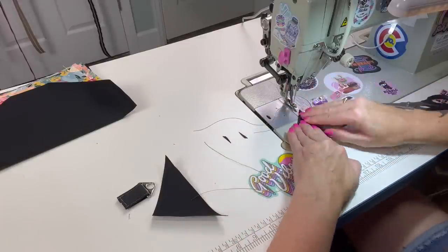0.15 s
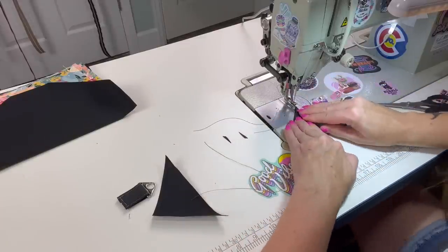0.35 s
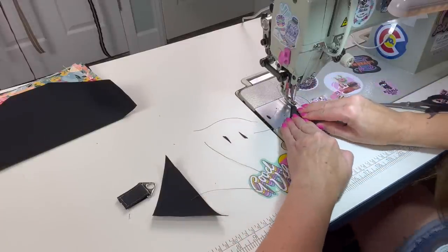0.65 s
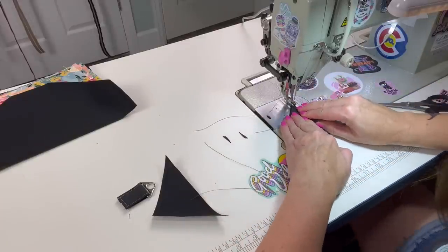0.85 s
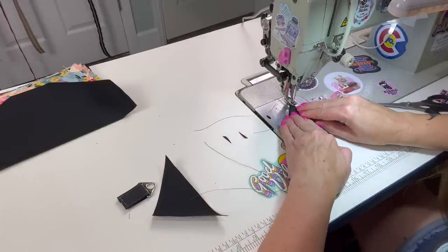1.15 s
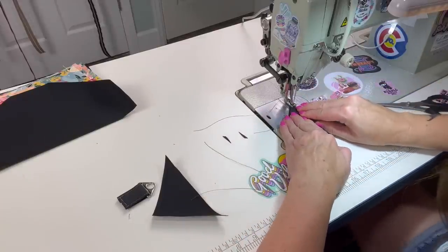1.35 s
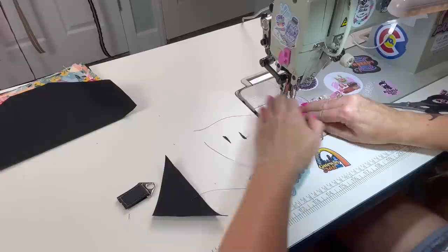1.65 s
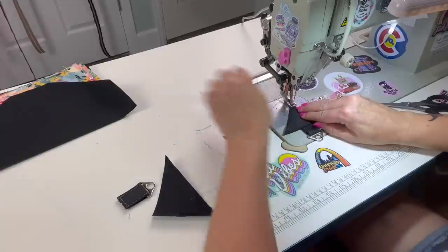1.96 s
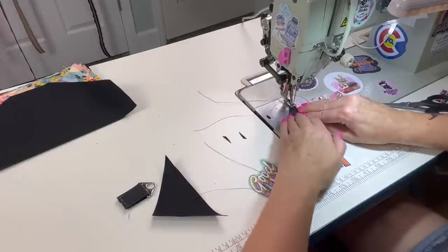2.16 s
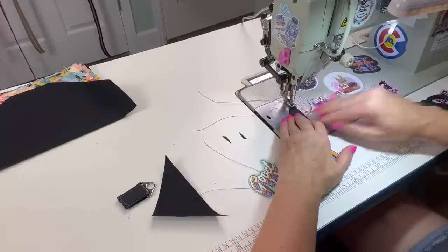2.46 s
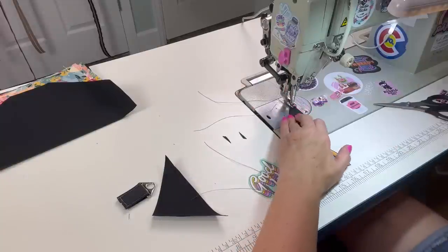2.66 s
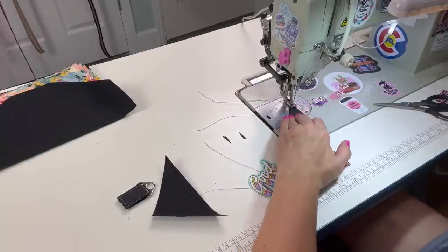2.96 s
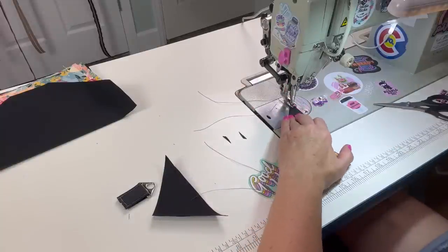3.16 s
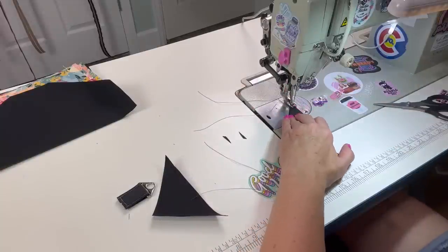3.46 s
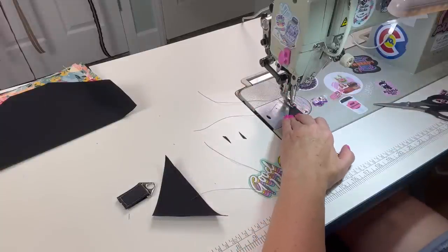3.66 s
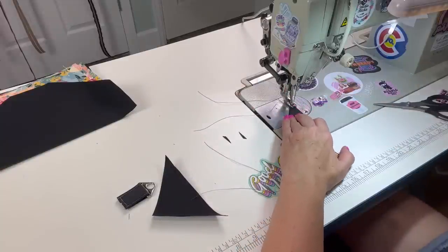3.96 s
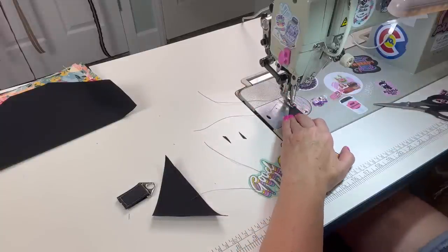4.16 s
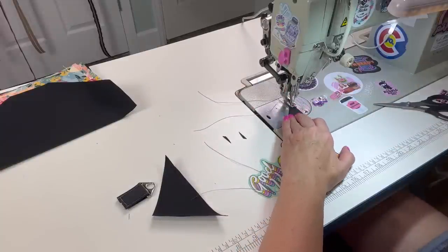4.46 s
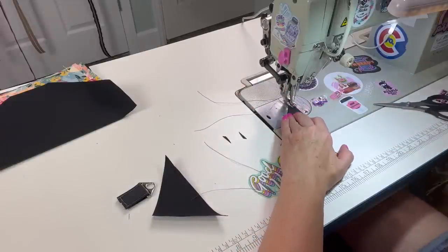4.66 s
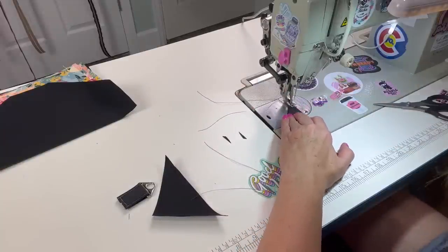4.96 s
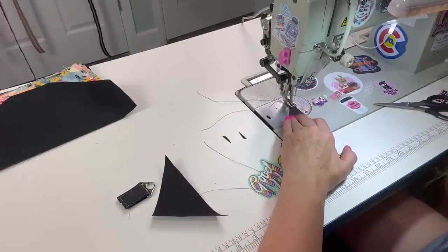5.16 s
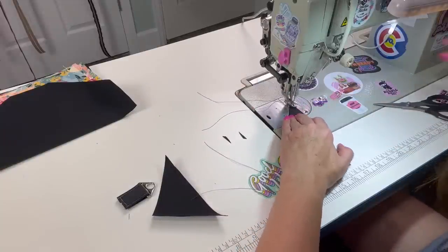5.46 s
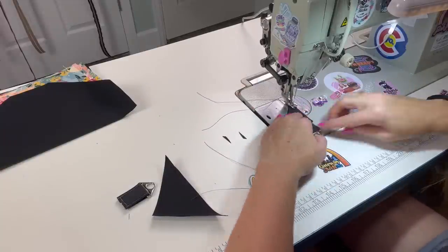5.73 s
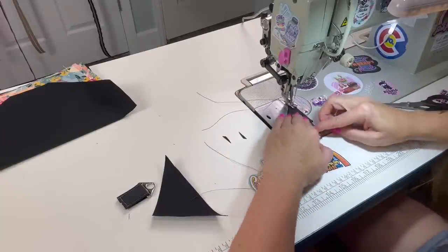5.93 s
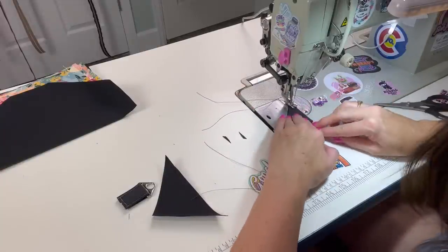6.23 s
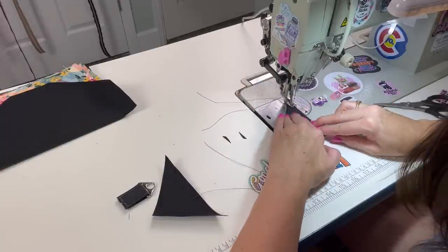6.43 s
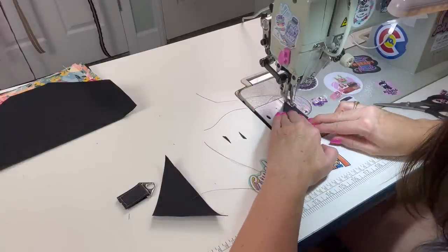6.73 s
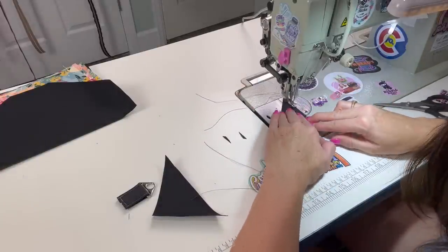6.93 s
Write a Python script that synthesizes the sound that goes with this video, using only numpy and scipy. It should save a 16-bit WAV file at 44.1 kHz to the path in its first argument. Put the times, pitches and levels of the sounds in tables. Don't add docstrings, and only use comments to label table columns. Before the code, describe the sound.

Soft fabric rustle and low thuds from a presser foot and knee lever, then quiet, then sharp little metallic snaps and a small tap. An industrial sewing machine starts slowly, each turn a woody knock with ticking steel, rasping hook and low motor hum. It brakes with thumps, rests, then stitches again slightly faster to the end. Close phone microphone, small room with short reverberation, steady low air rumble.

```python
import sys
import numpy as np
from scipy import signal
from scipy.fft import rfft, irfft, next_fast_len
from scipy.io import wavfile
from scipy.ndimage import uniform_filter1d

SR = 44100
rng = np.random.default_rng(int(sys.argv[2]) if len(sys.argv) > 2 else 0)


def transcribe(u):
    v = np.clip(np.atleast_2d(u).T, -1, 1)
    q = np.round(v * 32767).astype(np.int16)
    wavfile.write(sys.argv[1], SR, q)


def makeup_ratio(level_db):
    decades = np.asarray(level_db, float) / 20
    return 10 ** decades


N = 312669
T = np.arange(N) / SR

# needle down t/s, turn/s, knock level/dB, hook lag/s, hook tick level/dB
STITCHES = [(4.549, 0.18, -44, 0.039, -30), (4.733, 0.21, -41, 0.046, -25),
            (4.917, 0.23, -39, 0.041, -29.5), (5.102, 0.18, -39, 0.03, -36),
            (5.283, 0.21, -37, 0.031, -23.5), (5.463, 0.21, -40, 0.019, -44),
            (6.49, 0.15, -39.5, 0.031, -34), (6.634, 0.13, -39, 0.035, -31.5),
            (6.778, 0.14, -38.5, 0.024, -31.5), (6.919, 0.14, -36, 0.041, -29.5),
            (7.06, 0.087, -38, 0.036, -39)]
# t/s, drum level/dB, drum f/Hz, bed knock level/dB
JOLTS = [(4.39, -39.5, 226.5, -73), (4.626, -37.5, 100.5, -51), (4.784, -49, 196, -36.5),
         (5.188, -39, 70, -51), (5.36, -31.5, 500, -68), (5.679, -38, 334, -46), (5.703, -41, 257, -72),
         (5.72, -28.5, 179, -73), (5.791, -39.5, 149.4, -88), (5.919, -40, 72, -74),
         (6.025, -63, 105, -67.5), (6.21, -64, 190, -74), (6.332, -58, 299, -56.5),
         (6.398, -33.5, 86.5, -47.5)]


def unit(x):
    return x / np.sqrt(np.mean(x ** 2))


def on_log_hz(hz, table, col=1):
    table = np.array(table)
    return np.interp(np.log(np.maximum(hz, 1)), np.log(table[:, 0]), table[:, col])


def colour(x, table):
    size = next_fast_len(x.shape[-1])
    gain = makeup_ratio(on_log_hz(np.fft.rfftfreq(size, 1 / SR), table))
    return irfft(rfft(x, size) * unit(gain), size)[..., :x.shape[-1]]


def ring(x, modes):
    total, power = 0, 0
    for hz, db, t60_s in modes:
        pole = np.exp(2j * np.pi * hz / SR - np.log(1000) / (min(t60_s, 1) * SR))
        total = total + makeup_ratio(db) * signal.lfilter([1], [1, -pole], x).imag
        power += makeup_ratio(db) ** 2 / (2 * (1 - abs(pole) ** 2))
    return total / np.sqrt(power)


def peak_one(x):
    return x / np.abs(x).max()


def blows(times_s, dbs, lengths_s, rise_s=0.00038):
    envelope = np.zeros(N)
    for s, db, length_s in zip(*np.broadcast_arrays(np.atleast_1d(times_s), dbs, lengths_s)):
        start = int(s * SR)
        t = T[:min(int(8 * abs(length_s) * SR) + 8, N - start)]
        burst = (1 - np.exp(-t / rise_s)) * np.exp(-t / max(length_s, 1e-4))
        envelope[start:][:len(t)] += makeup_ratio(db) * burst
    return envelope * rng.standard_normal((2, N))


def grains(rate_hz, spread_db, length_s):
    size = makeup_ratio(spread_db * np.minimum(rng.exponential(size=N), 2.5))
    taps = (rng.random(N) < rate_hz / SR) * size
    envelope = signal.lfilter([1], [1, -np.exp(-1 / (length_s * SR))], taps)
    return unit((envelope + 0.24) * rng.standard_normal((2, N)))


def swell(s, rise_s, fall_s):
    return np.exp(-np.abs(T - s) / np.maximum(np.where(T < s, rise_s, fall_s), 1e-4))


def bar_times():
    s, turn_s = np.transpose(STITCHES)[:2]
    return (s + .035 + .2 * turn_s)[:-1]


def stitching():
    # full level/dB, slope dB per dB of load, sag over one turn/dB
    chatter = (-53, 0.8, -9)
    rumble = (-48, 0.52, -5.5)
    # f/Hz, level/dB, t60/s
    table_modes = [(61, -47, 0.21), (82.3, -3.5, 0.23), (118, -6.5, 0.14), (167.4, 12, 0.027),
                   (188.6, -4.5, 0.1), (246, -16, 0.09), (294.5, -5.5, 0.17), (314, -2.5, 0.14),
                   (500, 9, 0.0067)]
    bed_modes = [(550, 13, 0.017), (614, 1, 0.018), (837, -1, 0.08), (1150, 17, 0.011), (2430, 4, 0.028),
                 (2630, -7, 0.029), (3242, 3, 0.036)]
    plate_modes = [(1620, 6, 0.045), (1397, 0, 0.09), (1740, -1, .04), (1108, -6, .06), (829, -5, .07),
                   (666, -4, .05), (2867, -6, .05)]
    # f/Hz, level/dB
    rattle = [(250, -41), (500, 2), (1000, -4.5), (1700, 13), (3000, 2.5), (5000, -4), (10000, -19.5)]

    s, _, db = np.transpose(STITCHES)[:3]
    jolt_s, _, _, jolt_db = np.transpose(JOLTS)
    feed = blows(s - .002, db, 0.012, rise_s=0.0028)
    bar = blows(bar_times(), db[:-1] - 2.5, 0.006, rise_s=0.0024)
    knocks = feed + bar
    bed = makeup_ratio(-5.5) * gear(chatter) * grains(250, 4.1, 0.0029) + knocks + blows(jolt_s, jolt_db, .018)
    table = gear(rumble) * grains(150, 1.03, 0.0067)
    links = clacks(np.r_[s, bar_times()], np.r_[db, db[:-1]])
    body = makeup_ratio(-2.5) * ring(bed, bed_modes) + ring(table, table_modes)
    plate = makeup_ratio(-7.5) * ring(knocks + makeup_ratio(0.5) * bed, plate_modes)
    return body + plate + colour(bed, rattle) + links + thumps() + hum() + hook_steel() + pings()


def gear(layer):
    # t/s, level rel full/dB
    load = [
        [(4.15, -32.5), (4.22, -15), (4.36, -7.5), (4.56, 3), (5.56, 5), (5.63, -4), (5.71, -2.5), (5.77, -19),
         (5.9, -33)],
        [(6.2, -12.5), (6.29, -4), (6.41, -0.5), (6.49, 6), (6.7, 6), (7.09, 7.5)],
    ]
    drive = np.zeros(N)
    for rows in map(np.array, load):
        inside = (T >= rows[0, 0]) & (T <= rows[-1, 0])
        drive[inside] = makeup_ratio(np.interp(T[inside], rows[:, 0], rows[:, 1]))
    full_db, slope, sag_db = layer
    s, turn_s = np.transpose(STITCHES)[:2]
    last = np.maximum(np.searchsorted(s, T) - 1, 0)
    angle = np.where(T < s[0], 1, np.clip((T - s[last]) / turn_s[last], 0, 1))
    return makeup_ratio(full_db + sag_db * uniform_filter1d(angle, size=400)) * drive ** slope


def hook_steel():
    # full level/dB, slope dB per dB of load, sag over one turn/dB
    spin = (-50.5, 1.18, -7)
    # t/s, peak level/dB, rattle rel level/dB
    loose_ticks = [(4.311, -31.5, -16), (4.3918, -29.5, -17), (4.529, -41, -10.5), (4.64, -42, -8),
                   (5.088, -42.5, -7.5), (5.192, -36, -20), (5.5224, -30.5, -6.5), (5.6475, -41, -9.5),
                   (6.2466, -34, -16.5), (6.355, -32.5, -11), (6.552, -31.5, -8), (6.834, -33, -7.5)]
    # t/s, level/dB, length/s
    drags = [(4.312, -41.5, 0.0089), (4.392, -44, 0.007), (4.566, -38, .008), (4.752, -31, 0.0095),
             (4.935, -39, 0.011), (5.129, -39, 0.007), (5.18, -36, 0.0072), (5.285, -39, .008),
             (5.45, -35.5, 0.0071), (5.497, -35, 0.0071), (6.253, -43, 0.013), (6.341, -36.5, 0.0074),
             (6.515, -38, .012), (6.652, -34, 0.01), (6.698, -46, .008), (6.791, -43, 0.009),
             (6.94, -33, 0.0063)]
    # t/s, level/dB
    squeaks = [
        (4.315, -54),
        (4.4, -53),
        (5.58, -55),
    ]
    # f/Hz, level/dB
    bright = [(1500, -10.5), (3000, -2.5), (5000, 0), (6500, -2.5), (9000, -5.5), (12500, -15),
              (14200, -10.5), (16000, -40)]
    # f/Hz, level/dB, t60/s
    hook_modes = [(4630, 2, 0.03), (4560, -5, 0.02), (9000, -14, 0.02)]
    arm_modes = [(2240, 0, .045), (2170, -3, .03)]

    s, _, db, lag_s, hook_db = np.transpose(STITCHES)
    loose_s, loose_db, loose_tail_db = np.transpose(loose_ticks)
    at_s = np.r_[s, (s + lag_s)[:-1], loose_s]
    peak_db = np.r_[db - 5, hook_db[:-1], loose_db]
    tail_db = np.r_[np.full(2 * len(s) - 1, -11), loose_tail_db]
    ticks = blows(at_s, peak_db - 7.5, 0.00092, rise_s=.0001) + blows(at_s, peak_db + tail_db, 0.021)
    whirr = makeup_ratio(-7.0) * gear(spin) * grains(500, 1.4, 0.0028)
    rasp = makeup_ratio(-15) * whirr + blows(*np.transpose(drags), rise_s=0.012)
    squeak = blows(*np.transpose(squeaks), 0.044, rise_s=0.0066)
    arm = ring(whirr + ticks + makeup_ratio(11) * squeak, arm_modes)
    return colour(whirr + ticks, bright) + ring(rasp, hook_modes) + makeup_ratio(-15) * arm


def clacks(times_s, dbs):
    out, t = np.zeros(N + SR // 8), T[:SR // 20]
    for s, db, chance in zip(times_s, dbs, rng.standard_normal((len(times_s), 3, 3))):
        for pitch, size, late in chance:
            start = int((s + 0.0055 * abs(late)) * SR)
            hz = 1100 * makeup_ratio(3.5 * pitch)
            out[start:][:len(t)] += makeup_ratio(db - 4 + 2 * size) * np.sin(2 * np.pi * hz * t) * np.exp(-t / .006)
    return out[:N]


def thumps():
    out, t = np.zeros(N), T[:SR // 8]
    s, _, db = np.transpose(STITCHES)[:3]
    down = np.c_[s, db + 6, 225.5 * makeup_ratio(1.8 * rng.standard_normal(len(s)))]
    up = np.c_[bar_times(), db[:-1] + 6, np.full(len(s) - 1, 237)]
    for s, db, hz in np.r_[down, up, np.array(JOLTS)[:, :3]]:
        swing = np.sin(2 * np.pi * hz * t) * (1 - np.exp(-t / 0.0032)) * np.exp(-t / 0.019)
        out[int(s * SR):][:len(t)] += (makeup_ratio(db - 4.0) * swing)[:N - int(s * SR)]
    return out


def pings():
    # t/s, peak level/dB, ring f/Hz
    contacts = [(4.3107, -37, 5500), (4.3925, -36, 5060), (4.505, -50, 6200), (4.5316, -52, 4520),
                (4.5676, -49, 7500), (4.584, -33, 8900), (4.591, -33.5, 5560), (4.6412, -39.5, 3200),
                (4.7643, -36.5, 9700), (4.7746, -31.5, 6660), (4.782, -25, 2870), (4.9587, -35, 5540),
                (5.0584, -48, 8700), (5.1443, -41, 3780), (5.1913, -45, 6400), (5.3168, -30, 5560),
                (5.46, -37, 4700), (5.522, -44, 4930), (5.5435, -33.5, 3700), (5.6471, -54, 5930),
                (6.2447, -40.5, 5070), (6.3537, -37, 4600), (6.5158, -50, 11100), (6.5278, -46, 4700),
                (6.552, -35.5, 6000), (6.6357, -36.5, 4860), (6.673, -40, 4930), (6.693, -46, 11100),
                (6.7787, -37, 2530), (6.8368, -39, 5170), (6.9173, -39.5, 2700), (6.958, -35, 4870),
                (7.061, -39, 5720)]
    t60_s, edge_db = 0.01, 6.5
    out, tap = np.zeros(N + SR), 1. * (np.arange(SR // 50) == 0)
    edge = peak_one(ring(tap, [(9300, 0, 0.0037), (12500, 0.0029, 0.0026), (14800, 0, 0.002)]))
    for s, db, hz in contacts:
        part = ring(tap, [(hz, 0, t60_s), (1.21 * hz, -3, t60_s)])
        part = peak_one(ring(part, [(hz, 0, .0012)]))
        out[int(s * SR):][:len(tap)] += makeup_ratio(db) * (part + makeup_ratio(edge_db) * edge)
    return out[:N]


def hum():
    # start t/s, length/s, level/dB
    pulls = [
        (4.447, 0.26, -59),
        (4.635, 0.27, -57.5),
        (5.003, 0.26, -59.5),
        (5.286, 0.22, -52),
        (6.397, 0.037, -54),
        (6.487, 0.11, -52.5),
        (6.655, 0.53, -60),
    ]
    # multiple, level/dB
    orders = [(1, -32), (2, 0), (3, 1.5), (4, -6.5)]
    drive_hz, edge_s = 243.1 / 3, 0.013
    phase = 2 * np.pi * drive_hz * T
    level = np.zeros(N)
    for s, length_s, db in pulls:
        inside_s = np.minimum(T - s, s + length_s - T)
        level += makeup_ratio(db) * np.clip(inside_s / edge_s + .5, 0, 1)
    return makeup_ratio(2.0) * level * sum(makeup_ratio(db) * np.sin(k * phase + k) for k, db in orders)


def foot():
    # t/s, peak level/dB, plate ring level/dB, clank level/dB, push length/s
    hits = [
        (0.113, -34, -35, -50, 0.0039),
        (0.159, -43, -39.5, -59, 0.0087),
        (0.197, -45, -45.5, -74, 0.006),
        (1.343, -42.5, -44, -56.5, 0.0045),
        (1.424, -33.5, -38.5, -32.5, 0.0053),
        (1.461, -39, -48, -62, 0.0057),
        (3.278, -65, -60, -51, 0.0017),
        (3.542, -50.5, -58, -57.5, 0.0038),
    ]
    # peak t/s, level/dB, f/Hz, rise/s, fall/s
    shudders = [
        (0.124, -47.5, 125.3, 0.0068, 0.089),
        (0.259, -45, 109, 0.047, 0.019),
        (1.255, -40, 113.5, 0.029, 0.045),
        (1.32, -37.5, 121, 0.0097, 0.014),
    ]
    # f/Hz, level/dB, t60/s
    low_modes = [(130, -12, 0.12), (254, -7, 0.12), (318.8, 4, 0.17), (351, -3, 0.1), (439, -13, 0.062)]
    mid_modes = [(625, 5.5, 0.07), (702, 10.5, 0.058), (793, 1.5, 0.046), (1135, -5, 0.04)]
    lever_modes = [(1990, 1.5, 0.05), (2840, -3, 0.06), (3460, -2, 0.05), (4300, 0, .045)]
    pin_modes = [(1153, -18, 0.1), (2260, -27, 0.16), (5071, -11, 0.07), (6800, -28, 0.06),
                 (8640, -15, 0.2), (468, -22, .07), (813, -25, .07), (307, -23, .08)]
    # f/Hz, level/dB
    clank_colour = [(200, -5.5), (600, 15.5), (1500, -7), (3000, 4.5), (5000, -2), (9000, -19),
                    (16000, -51)]
    pin_clack = [(130, 13.5), (250, 9.5), (600, 4.5), (1400, -12), (3400, -13.5), (6300, -2.5),
                 (9000, -3.5), (12500, -11.5)]

    s, db, plate_db, clank_db, push_s = np.transpose(hits)
    thuds = makeup_ratio(9.5) * ring(blows(s - .002, db, 0.75 * push_s), low_modes)
    thuds = thuds + makeup_ratio(9) * ring(blows(s - .002, plate_db, 0.33 * push_s), mid_modes)
    clank = blows(s - .001, clank_db, 4 * push_s)
    thuds = thuds + makeup_ratio(-3.0) * colour(clank, clank_colour) + makeup_ratio(-21.5) * ring(clank, lever_modes)

    shudder = np.zeros(N)
    for s, db, hz, rise_s, fall_s in shudders:
        shudder += makeup_ratio(db) * swell(s, rise_s, fall_s) * np.sin(2 * np.pi * hz * (T - s))

    pin_s = 3.5375
    touch = blows(pin_s, -9.5, 0.00089, rise_s=.0001) + blows(pin_s, -26, 0.028)
    tap = 1. * (np.arange(N) == int(pin_s * SR))
    pin = colour(touch, pin_clack) + makeup_ratio(2.5) * ring(tap, pin_modes)
    return thuds + makeup_ratio(-0.5) * uniform_filter1d(shudder, size=40) + makeup_ratio(-29.5) * peak_one(pin)


def snaps():
    # t/s, low ring level/dB, high
    # ring level/dB, high ring f/Hz, top level/dB
    events = [(2.078, -68, -64, 5400, -95), (2.143, -67, -55.5, 6150, -63), (2.7176, -66, -87, 5270, -83.5),
              (2.7812, -35, -26.5, 6200, -42), (2.83, -46, -18.5, 6440, -38.5),
              (2.993, -54.5, -44.5, 6200, -71.5), (3.026, -73, -28, 6120, -40.5),
              (3.222, -62, -66.5, 5800, -70.5), (3.2414, -39, -40, 4900, -65),
              (3.271, -36.5, -31, 5600, -37.5), (3.2735, -25.5, -20, 6370, -32.5),
              (3.2837, -38, -39.5, 5200, -57.5), (2.7924, -52, -45.5, 6200, -58),
              (2.8345, -53, -33.5, 7000, -53), (4.783, -44, -59, 5000, -89),
              (5.2765, -27.5, -24, 6230, -48), (5.983, -68, -56.5, 5100, -88.5),
              (6.026, -58.5, -53.5, 4900, -67)]
    # t/s, level/dB
    bounces = [
        (2.7812, -38),
        (2.7925, -41),
        (2.806, -50.5),
    ]
    # f/Hz, level/dB, t60/s
    handle_modes = [(2390, -9, .04), (3316, -1, .04), (2900, -4, .04), (3830, -8, .04), (4436, -7, .05),
                    (2080, -12, .04)]
    blade_modes = [(7354, -1.5, .07), (6360, -9, 0.037), (5600, -6, .04), (3500, -5, 0.044)]
    # f/Hz, level/dB
    joint = [(800, -48), (1400, -26), (2600, -1), (4000, -1.5), (7000, -2), (12000, -21)]

    out, crack = np.zeros(N), np.zeros(SR // 16)
    crack[[30, 70, 90]] = .04, -.2, 1
    low_hz = 3125
    low = [(low_hz, 0, .005), (.77 * low_hz, -16, .014), (.9 * low_hz, -3, .005)]
    top = [(8750, 13.0, 0.00077), (12000, 6.5, 0.0011), (13900, 6.0, 0.00032)]
    for s, low_db, high_db, high_hz, top_db in events:
        high = [(high_hz, 0, .003), (1.14 * high_hz, -6, .004)]
        for modes, db in ((low, low_db + 2.0), (high, high_db - 1.0), (top, top_db + 15.5)):
            part = ring(ring(crack, modes), modes)
            out[int(s * SR) - 55:][:len(crack)] += makeup_ratio(db) * peak_one(part)
    loop = peak_one(ring(crack, [(2397, 0, 0.027)]))
    for s, db in bounces:
        out[int(s * SR) - 90:][:len(crack)] += makeup_ratio(db) * loop
    out = signal.sosfilt(signal.butter(4, 1600, "high", fs=SR, output="sos"), out)

    s, low_db, high_db = np.transpose(events)[:3]
    handle = ring(blows(s + 0.0017, low_db - 10, 0.0016), handle_modes)
    blade = ring(blows(s + 0.0012, high_db - 19, .003), blade_modes)
    rattle = colour(blows(s + 0.00056, low_db - 15, 0.012), joint)
    side_lead = 14
    return np.array([out, np.roll(out, -side_lead)]) + handle + blade + rattle


def cloth():
    # peak t/s, level/dB, treble rel level/dB, rise/s, fall/s
    slides = [(.002, -74.5, 10, .01, .1), (0.05, -55, -4, 0.0017, 0.02), (0.057, -54.5, 4.5, 0.0023, 0.037),
              (.17, -52.5, -3, 0.014, 0.039), (.242, -62, -5, .006, 0.063), (.31, -65.5, 1, 0.004, 0.025),
              (.37, -62.5, -1, 0.0017, 0.035), (0.444, -57, -3.5, 0.0016, 0.034),
              (.53, -62, -17, 0.024, 0.063), (3.95, -86, -21, .1, 0.38), (.76, -75.5, -5, 0.026, 0.17),
              (1.203, -72, 3.5, .002, 0.13), (1.345, -53.5, -30, 0.0056, 0.011),
              (1.35, -53, 4, 0.0018, .006), (1.42, -55.5, -2.5, 0.0049, 0.071),
              (1.59, -54.5, 2, .002, 0.0091), (1.601, -56.5, 6.5, 0.004, 0.028),
              (1.232, -72, -3, .001, .006), (1.296, -65, -14, .001, 0.0065), (2.085, -73, 2, 0.0061, 0.03),
              (2.15, -96, 28, .004, 0.023), (2.384, -70.5, 9.5, 0.018, 0.018),
              (2.485, -62, 5, 0.0053, 0.03), (4.189, -53.5, -9, 0.0075, 0.033), (4.265, -71, -3, .015, .05),
              (5.93, -68.5, -12, .012, 0.073), (6.03, -86, 0, 0.022, 0.057), (6.1, -79.5, 9.5, 0.022, 0.02),
              (6.2, -78, -29.5, 0.011, 0.14)]
    level, treble = np.zeros(N), np.zeros(N)
    for s, db, rel_db, rise_s, fall_s in slides:
        slide = swell(s, rise_s, fall_s)
        level += makeup_ratio(db) * slide
        treble += makeup_ratio(db + rel_db) * slide
    body = colour(grains(700, 0.45, 0.0027),
                  [(300, 6.0), (800, 2.5), (1600, 2.5), (3000, -0.5), (4500, -7.5), (8000, -23.5)])
    sheen = colour(grains(600, 2.6, 0.0023),
                   [(2500, -12.0), (5000, 0.0), (6500, 1.5), (10000, -3), (13500, -28.0), (16000, 3)])
    return makeup_ratio(1.0) * level * body + makeup_ratio(-0.5) * treble * sheen


def air():
    # f/Hz, level/dB
    duct = [(15, -54), (41, -2), (63, -5.5), (149, -11), (293, -18), (476, -28), (988, -40.5),
            (16000, -57.5)]
    noise = unit(colour(rng.standard_normal((2, N)), duct))
    drift = uniform_filter1d(rng.standard_normal(N), size=3000)
    wander = unit(uniform_filter1d(drift, size=3000))
    bass = signal.sosfilt(signal.butter(2, 300, fs=SR, output="sos"), noise)
    return makeup_ratio(-59) * (noise + (makeup_ratio(4.03 * wander) - 1) * bass)


def room(x):
    # f/Hz, t60/s, share level/dB
    decay = [(98.4, 0.54, -3.5), (500, 0.31, -0.5), (1520, 0.27, 3.5), (3000, 0.32, 0), (7000, 0.34, -6),
             (13580, 0.18, -2.5)]
    t, tail = T[:SR // 2], 0
    for hz in 125 * 2. ** np.arange(8):
        octave = [(hz / 2, -40), (hz / 1.5, 0), (hz * 1.4, 0), (hz * 2, -40)]
        band = colour(rng.standard_normal((2, len(t))), octave)
        share = np.sqrt(hz) * makeup_ratio(on_log_hz(hz, decay, col=2))
        tail = tail + share * band * np.exp(-np.log(1000) * t / on_log_hz(hz, decay))
    gap_s = 0.0034
    tail = tail * np.clip(t / gap_s - 1, 0, 1)
    tail = makeup_ratio(-5.5) * tail / np.sqrt(np.sum(tail ** 2) / 2)
    return signal.fftconvolve(x, tail, axes=1)[:, :N]


def ports(views):
    # f/Hz, likeness 0-1, left minus right level/dB, phase bend by the phone body/rad
    pair = [(60.3, 1, 0, 0.39), (245, 0.74, 1.5, -0.11), (720, .45, -3.5, 1.29), (1710, 0.26, -0.5, -0.47),
            (6300, 0, -3.5, 1.6), (8250, .99, -.3, 0), (11000, .95, 0, 0), (13250, 1, 0, -1.5)]
    lag_s = 183e-6
    size = next_fast_len(N)
    hz = np.fft.rfftfreq(size, 1 / SR)
    like, tilt_db, bend_rad = (on_log_hz(hz, pair, col=k) for k in (1, 2, 3))
    like = np.clip(like, 0, 1)
    left, other = rfft(views, size)
    shared = left * np.exp(1j * (2 * np.pi * hz * lag_s + bend_rad))
    right = like * shared + np.sqrt(1 - like ** 2) * other
    return irfft(np.array([left * makeup_ratio(tilt_db / 2), right * makeup_ratio(-tilt_db / 2)]), size)[:, :N]


def scene():
    near, side = stitching() + foot() + cloth(), snaps()
    pan_db = np.array([[1], [-1]]) * -4.5 / 2
    return ports(near + room(near + side) + air()) + side * makeup_ratio(pan_db)


def low_pass(x):
    return signal.sosfilt(signal.butter(12, 16450, fs=SR, output="sos"), x)


def record(dry):
    # f/Hz, level/dB
    edges = [(20, -35), (45, -4.5), (13500, 1), (14300, 4.5), (15200, -11), (16000, -15), (17000, -55.5)]
    size = next_fast_len(N)
    gain = makeup_ratio(on_log_hz(np.fft.rfftfreq(size, 1 / SR), edges))
    heard = irfft(rfft(dry, size) * gain, size)[:, :N]
    return low_pass(heard)


dry = scene()
out = record(dry)
transcribe(out)
```